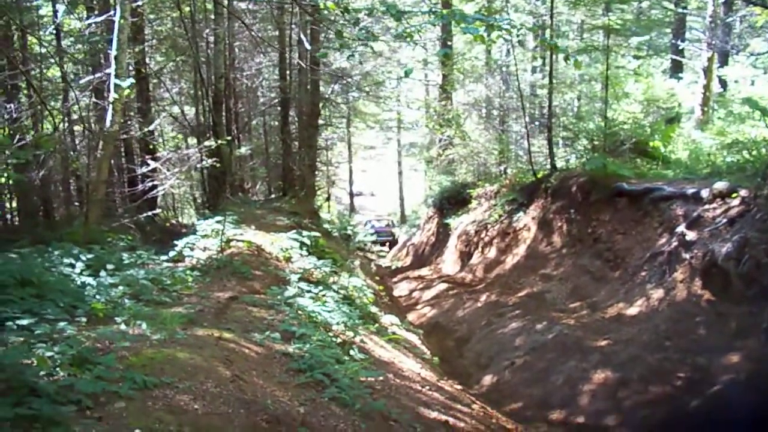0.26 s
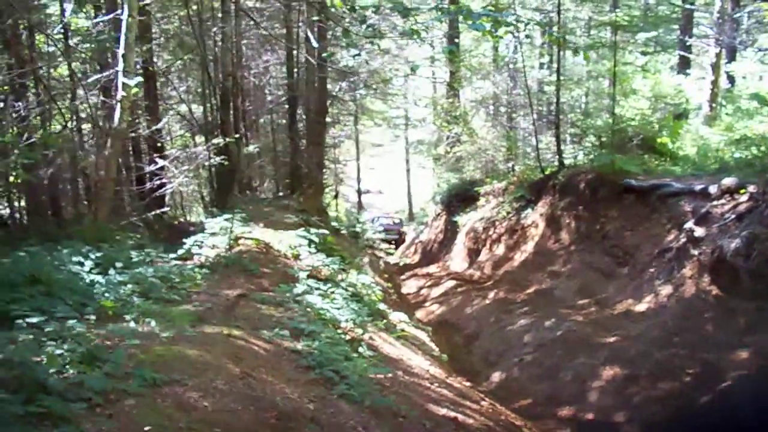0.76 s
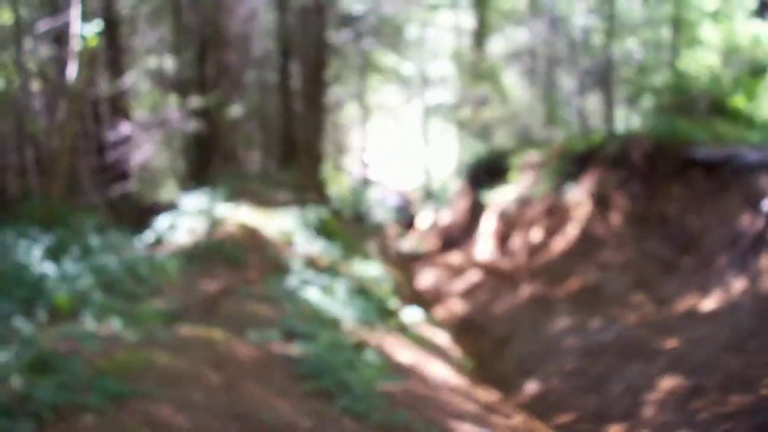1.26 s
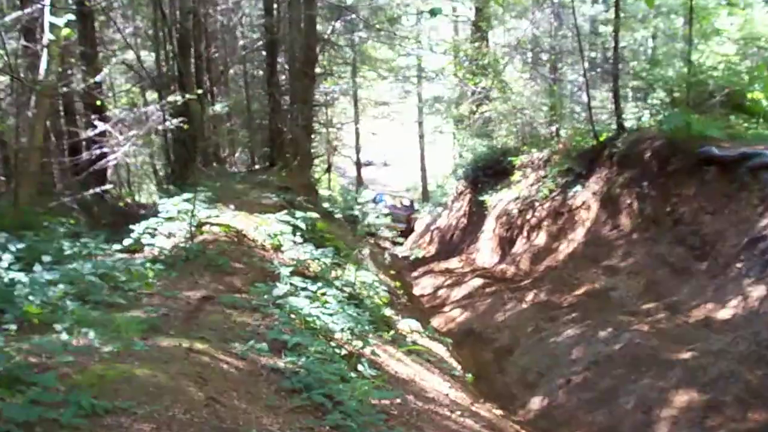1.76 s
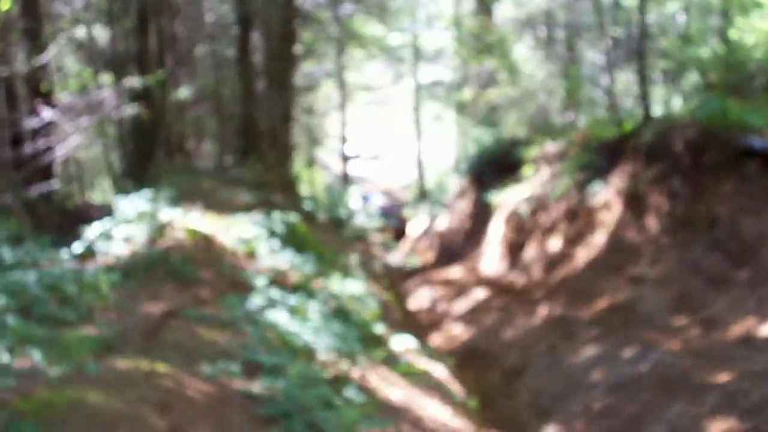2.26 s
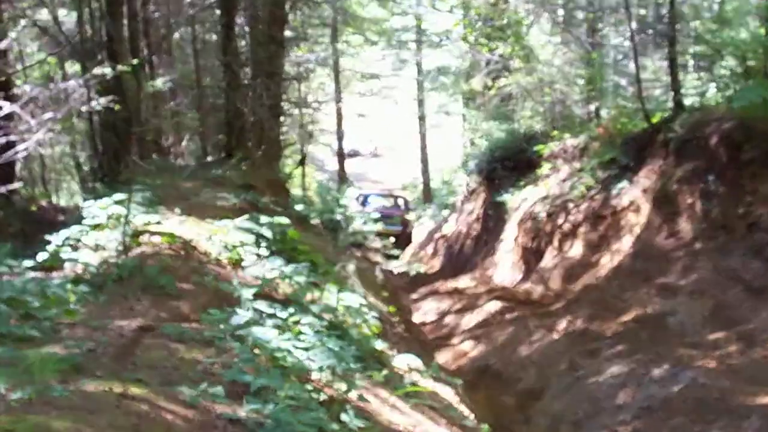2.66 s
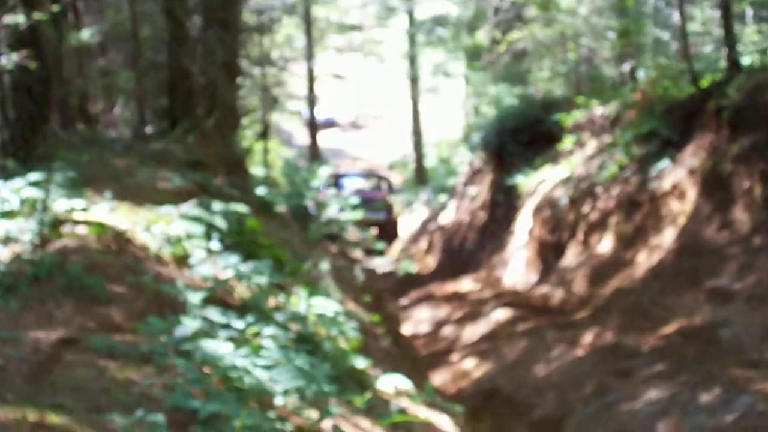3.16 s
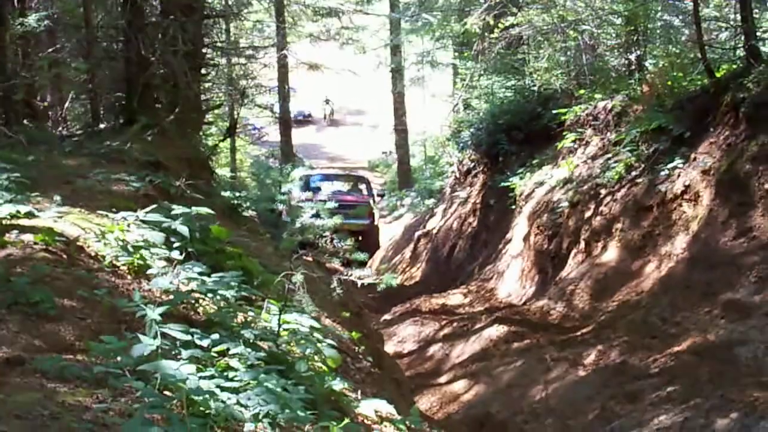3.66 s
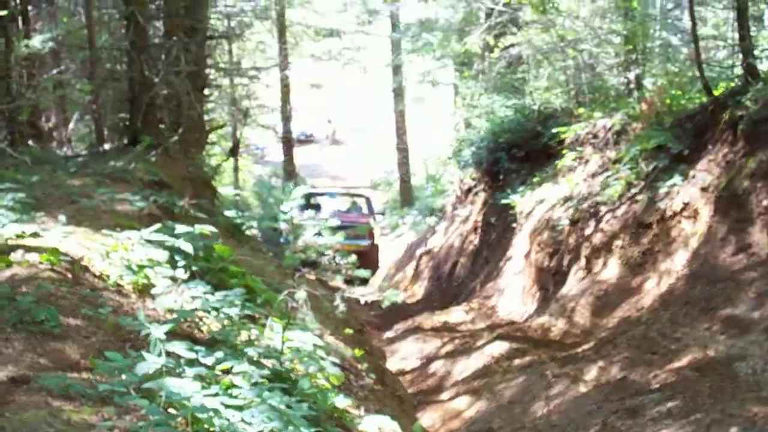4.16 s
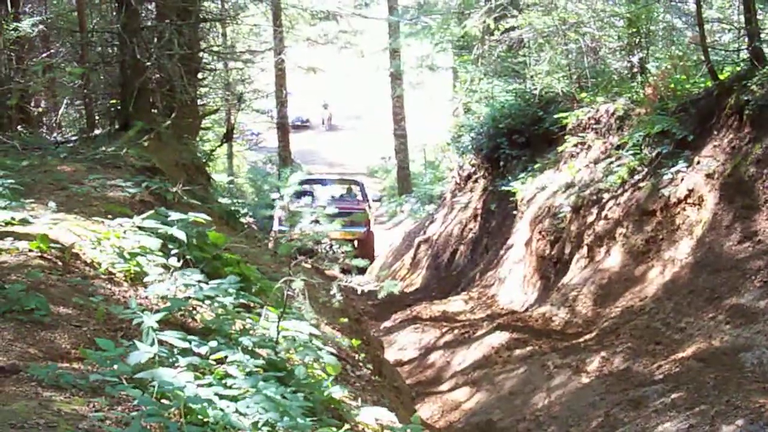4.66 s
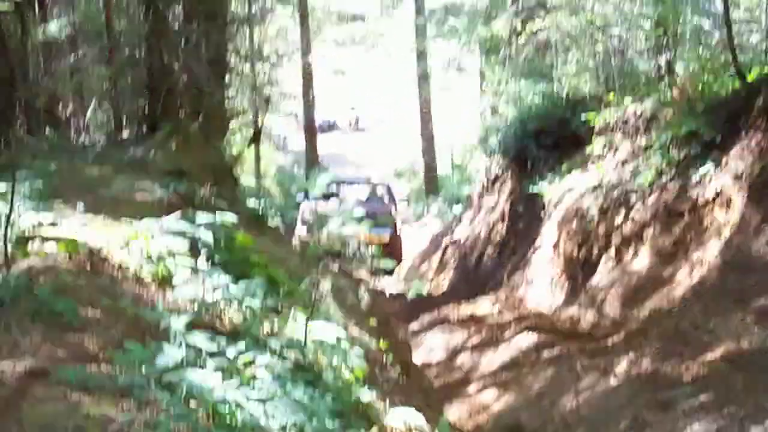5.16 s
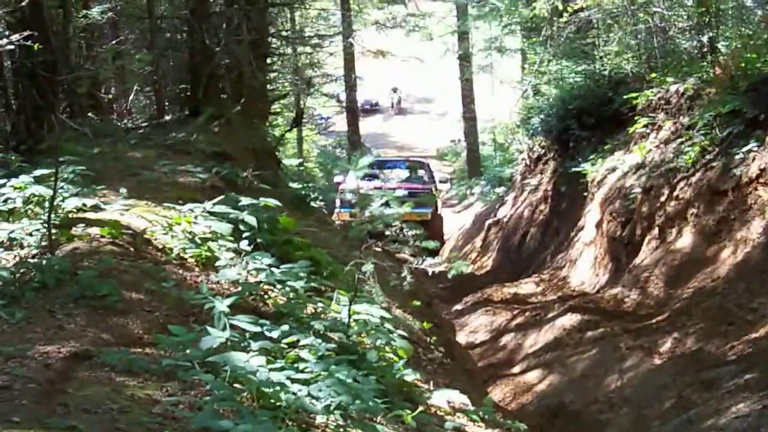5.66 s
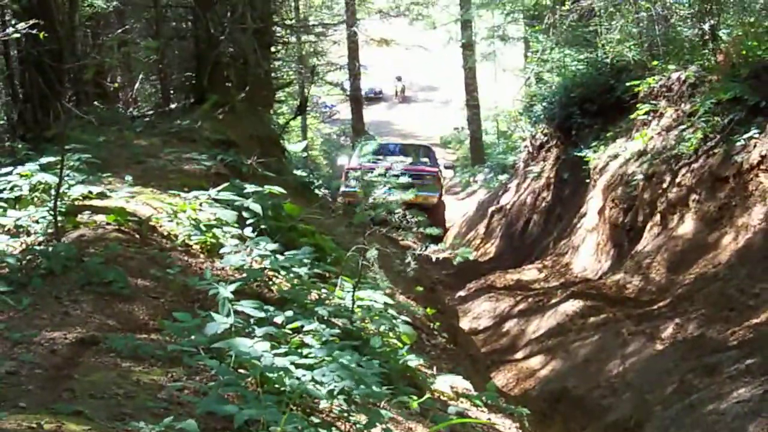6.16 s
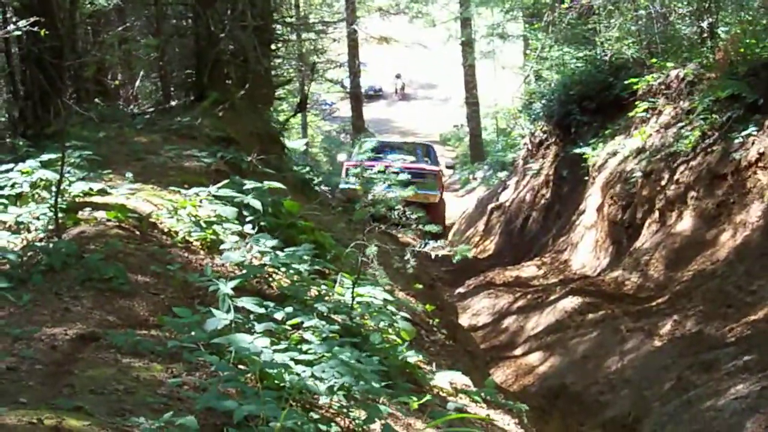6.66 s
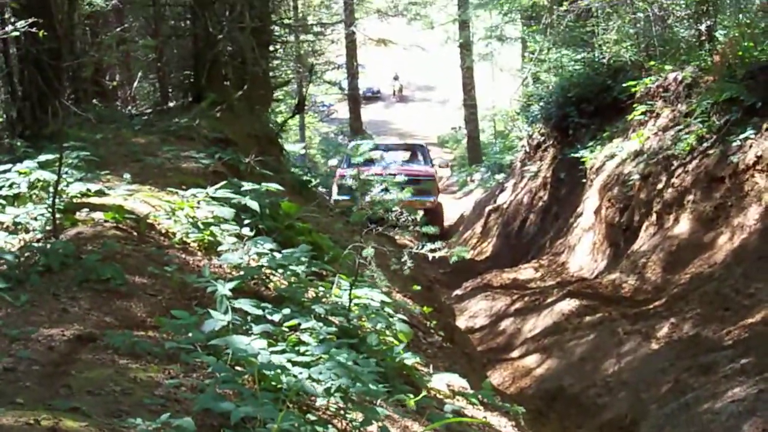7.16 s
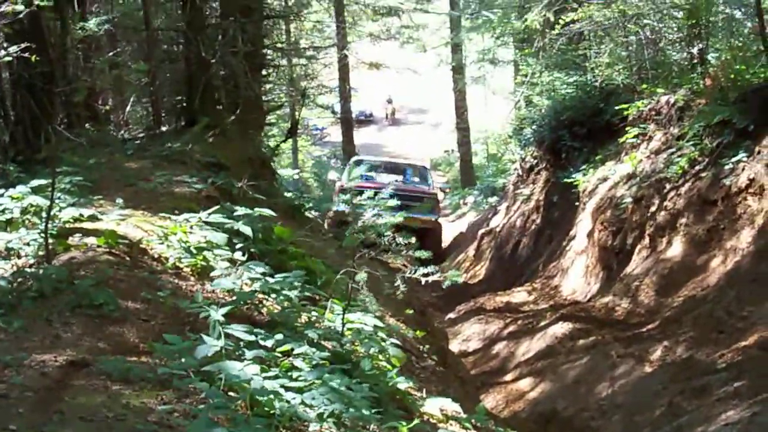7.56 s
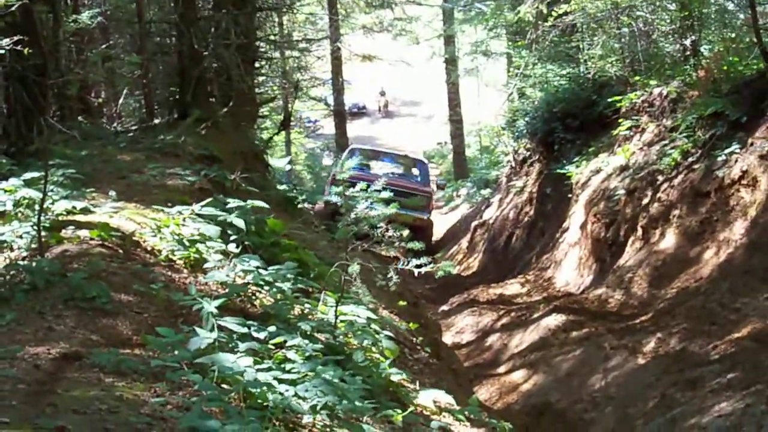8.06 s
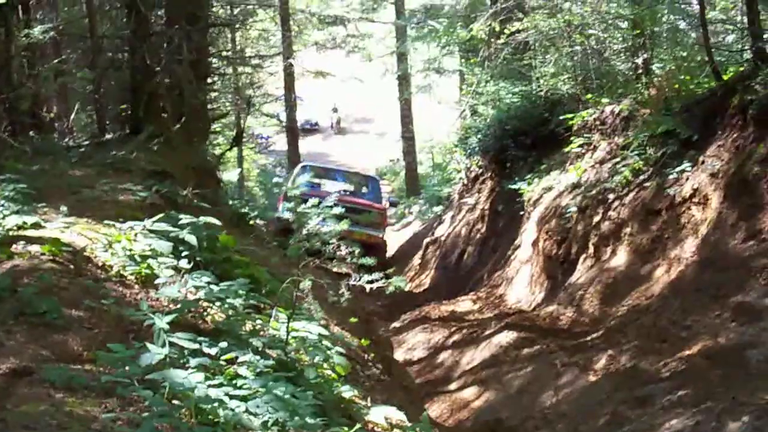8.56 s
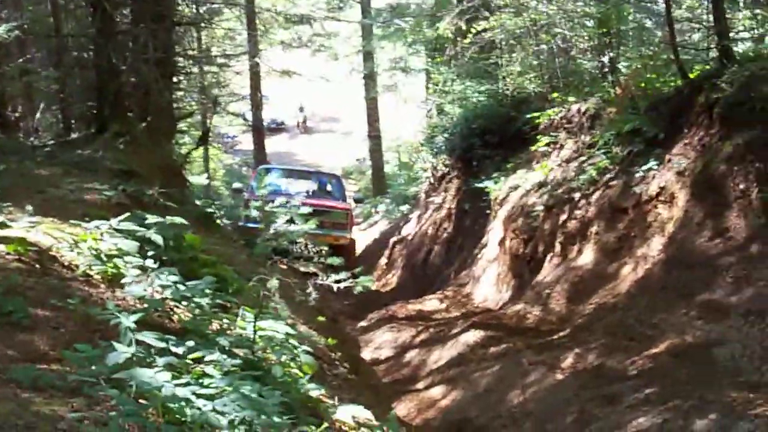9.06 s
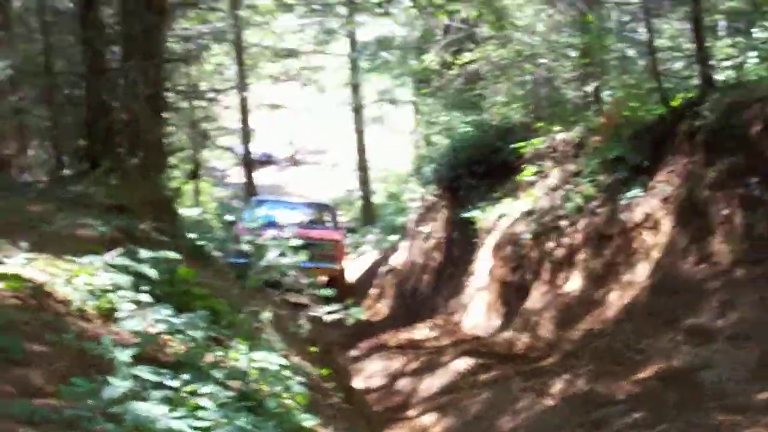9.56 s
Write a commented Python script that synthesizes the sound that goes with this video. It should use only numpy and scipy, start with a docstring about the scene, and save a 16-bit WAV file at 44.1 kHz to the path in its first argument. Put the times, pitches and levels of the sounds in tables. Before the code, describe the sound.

A diesel V8 works slowly uphill through a forest, burbling unevenly with rough exhaust bark and fine clatter. It sags early as the driver lifts off, then pulls harder, holds a higher throb and finally eases down, louder and nearer. Close to the hand-held camera, air thumps, plastic ticks and short zoom whirrs occupy the first few seconds over steady hiss.

```python
"""A V8 diesel truck crawls up a dirt gully in a forest, towards a hand-held camera.
Tones at multiples of the engine cycle make its boom and burble; bursts of noise at each firing make its
bark and clatter. All follow engine speed, pedal and distance: the driver lifts off, pulls harder, then eases.
Close by, air nudges the microphone, the camera body ticks and its zoom motor whirrs, all from noise but the air.
Leaves rustle once (a swell of noise) over the steady hiss of the forest and microphone."""
import sys
import numpy as np
from scipy import signal
from scipy.fft import rfft, irfft
from scipy.io import wavfile

SR = 44100
rng = np.random.default_rng(int(sys.argv[2]) if len(sys.argv) > 2 else 0)


def log_audio(samples):
    """Write samples as a 16-bit WAV file to the path given in sys.argv[1]."""
    # one column per channel
    frames = np.atleast_2d(samples).T
    # limit to full scale, then quantise
    limited = np.clip(frames, -1, 1)
    pcm = np.round(limited * 32767).astype(np.int16)
    wavfile.write(sys.argv[1], SR, pcm)


N = 432180
TIME = np.arange(N) / SR
BINS = np.fft.rfftfreq(N, 1 / SR)


def amp(db):
    """Decibels to gain."""
    return 10 ** (np.asarray(db) / 20)


def unit(x):
    """Scales to rms 1."""
    return x / np.sqrt(np.mean(x ** 2) + 1e-20)


def shape(points):
    """A spectrum in dB on every frequency bin, joined by lines over log frequency."""
    hz, db = np.transpose(points)
    return np.interp(np.log(BINS + 1), np.log(hz + 1), db)


def hump(hz, width_hz):
    """A resonance with steep skirts, in dB on every frequency bin."""
    return -20 * np.log10(1 + ((BINS - hz) / width_hz) ** 2)


def colour(x, db):
    """Filters x by a spectrum in dB; rms 1."""
    return unit(irfft(rfft(x) * amp(db), N))


def bell(s, half_length):
    """A smooth swell of height 1 around a moment."""
    return np.exp(-((TIME - s) / half_length) ** 2)


def wander(rate_hz):
    """Smooth chance of rms 1, drawn 400 times a second and joined by lines."""
    slow = np.arange(0, TIME[-1] + 1, 1 / 400)
    hz = np.fft.rfftfreq(len(slow), slow[1])
    spectrum = rfft(rng.standard_normal(len(slow)))
    drift = irfft(spectrum * np.exp(-(hz / rate_hz) ** 2), len(slow))
    return np.interp(TIME, slow, unit(drift))


# engine speed up the hill: (time [s], engine cycles a second [Hz])
ENGINE_SPEED = [(0, 13.55), (.75, 14.27), (1, 12.7), (1.25, 13.87), (1.88, 9.13), (2.25, 8.42),
                (2.88, 13.68), (3.55, 17.7), (4, 16.14), (5.2, 16.33), (5.62, 17.44), (6, 17.56),
                (6.5, 18.6), (6.88, 18.44), (7.12, 19), (7.75, 18.7), (8, 18.18), (8.25, 18.2),
                (8.62, 16.82), (8.88, 15.33), (9.8, 13.07)]


def engine_speed():
    """Engine cycles a second, joined by straight lines in time."""
    rows = np.asarray(ENGINE_SPEED)
    return np.interp(TIME, rows[:, 0], rows[:, 1])


# the driver eases off the pedal: (start [s], end [s], share of the pedal let go [0-1])
PEDAL_LIFTS = [(0.725, 1.21, 0.14), (1.35, 2.432, 0.7), (8.146, 10.01, 0.27)]
RELEASE_S, PRESS_S = 0.74, 0.27  # the foot comes off slowly and goes down quickly


def pedal_lift():
    """How far the foot is off the pedal, 0-1."""
    lift = 0
    for start, end, share in PEDAL_LIFTS:
        ramp = np.minimum((TIME - start) / RELEASE_S, (end - TIME) / PRESS_S)
        lift = lift + share * np.clip(ramp, 0, 1)
    return lift


# short stabs on the pedal: (time [s], half length [s], strength [0-1])
PEDAL_STABS = [(.62, .15, 0.8), (2.46, 0.1, 0.42), (2.804, 0.41, 0.94), (3.485, 0.38, 0.33)]


def effort(speed, level_db, octave_db, lift_db, stab_db):
    """Gain of an engine layer: level at 16 Hz, change per octave of revs, with pedal let go and at a stab."""
    octaves = np.log2(speed / 16)
    stab = sum(strength * bell(s, length) for s, length, strength in PEDAL_STABS)
    return amp(level_db + octave_db * octaves + lift_db * pedal_lift() + stab_db * stab)


START_M, CRAWL_M_PER_S = 49.7, 2.59  # distance of the truck at first, and its pace up the hill


def nearness():
    """The sound grows in inverse proportion to the distance."""
    return START_M / np.maximum(START_M - CRAWL_M_PER_S * TIME, 1)


# the eight firings in order; each bank fires unevenly: (strength at the near tailpipe [0-1])
FIRING_STRENGTHS = np.array([.96, .49, .47, .79, .47, .73, .96, .47])


def order_lag(order, dispersion=.18):
    """The firing pattern sets the phase of each order, and the silencer smears the pulses."""
    slots = np.arange(len(FIRING_STRENGTHS)) / len(FIRING_STRENGTHS)
    pattern = np.sum(FIRING_STRENGTHS * np.exp(-2j * np.pi * order * slots))
    return np.angle(pattern) + dispersion * order ** 2


def order_tone(turns, order):
    """One multiple of the engine cycle; rms 1."""
    return np.sqrt(2) * np.cos(2 * np.pi * order * turns + order_lag(order=order))


def firing_bursts(turns, speed, uneven, scatter_db, decay_s, wash):
    """Noise that flares at each firing and dies away, over a wash scattered by the trees."""
    cylinders = len(FIRING_STRENGTHS)
    firing = np.floor(turns * cylinders).astype(int)
    starts = np.flatnonzero(np.diff(firing)) + 1
    strength = np.abs(FIRING_STRENGTHS[firing[starts] % cylinders]) ** uneven
    scatter = rng.standard_normal(N // 100)[:len(starts)]
    kicks = np.zeros(N)
    kicks[starts] = strength * amp(scatter_db * scatter)
    # dividing by speed offsets the closer spacing of the firings at high revs
    power = signal.lfilter([1], [1, -np.exp(-2 / (decay_s * SR))], kicks ** 2 / speed)
    return np.sqrt(power / power.mean() + abs(wash)) * rng.standard_normal(N)


# the fifth order slides through the resonances of the pipe: (frequency [Hz], level before nearing [dB])
BOOM_RESONANCES = [(45, -40), (56, -45), (65, -31.5), (71, -30.5), (76, -33.5), (82, -28), (87, -25.5),
                   (95, -28.5)]
# the boom fades briefly: (time [s], half length [s], change [dB])
BOOM_FADES = [(4.574, 0.42, -6), (6.256, 0.21, -7)]


def boom(turns, speed, flutter=0.0094, lift_db=-14):
    """The uneven banks give a strong fifth order and a faint third."""
    pipe_db = np.interp(5 * speed, *np.transpose(BOOM_RESONANCES))
    fade_db = sum(db * bell(s, length) for s, length, db in BOOM_FADES)
    fifth = amp(pipe_db + fade_db + lift_db * pedal_lift()) * order_tone(turns, order=5)
    third_gain = effort(speed, level_db=-50, octave_db=14.5, lift_db=2.5, stab_db=-8.5)
    third = third_gain * order_tone(turns, order=3)
    return (fifth + third) * (1 + flutter * wander(rate_hz=8.9))


# uneven firing favours some multiples of the engine cycle: (relative level of orders 6, 7, 8, ... [dB])
USUAL_ORDERS = [3.5, 12.5, 22, 17, 12, 14.5, 13.5, 9, 9.5, 2, 10.5, 2, 4, 1.5, -4.5, 4, -3, -8, -9.5, -13.5,
                -0.5, -13.5, -6, -15.5, -8.5, -10, -8.5, -4.5, -7.5, -10.5]
# near cruising speed the pulses meet differently in the pipe: (relative level of the same orders [dB])
CRUISING_ORDERS = [5, 14.5, 15, 14.5, 14, 16.5, 16, 3, 8.5, 6.5, -1, 9, 9, 3.5, 1, -7.5, 4, -13.5, -5.5,
                   -3.5, -0.5, 0, -5.5, -5, -13.5, -4, -13.5, -0.5, -4.5, -9.5]
CRUISE_HZ, CRUISE_WIDTH_HZ = 16.1, 0.85  # engine cycles a second
# resonances that those orders slide through: (frequency [Hz], relative level [dB])
TAILPIPE_RESONANCES = [(70, -26.5), (88, -23.5), (110, -27.5), (130, -29), (150, -18), (185, -14),
                       (205, -23), (225, -13), (265, -23.5), (295, -17.5), (330, -25), (375, -13),
                       (415, -15), (455, -8.5), (560, -16), (680, -22.5)]


def burble(turns, speed, flutter=0.2, drift=0.084, bright_db=7):
    """Clean orders of the engine cycle shift in balance as they slide through the pipe's resonances."""
    out = np.zeros(N)
    revs = np.log2(speed / CRUISE_HZ)
    cruising = np.exp(-((speed - CRUISE_HZ) / CRUISE_WIDTH_HZ) ** 2)
    for order, (usual_db, cruise_db) in enumerate(zip(USUAL_ORDERS, CRUISING_ORDERS), start=6):
        size = (1 - cruising) * amp(usual_db) + cruising * amp(cruise_db)  # blend of the two patterns
        fading = 1 + flutter * order / 10 * wander(rate_hz=2.87)  # paths between the trees change
        tailpipe_db = np.interp(order * speed, *np.transpose(TAILPIPE_RESONANCES))
        edge_db = bright_db * revs * np.log2(order / 10)  # the pulses sharpen with the revs
        slip = drift * wander(rate_hz=0.83) / order  # each phase drifts, so the throb changes shape
        tone = order_tone(turns + slip, order=order)
        out += size * amp(tailpipe_db + edge_db) * fading * tone
    return out * effort(speed, level_db=-34, octave_db=0.5, lift_db=-11, stab_db=2.0)


# rough puffs through pipe and silencer: (frequency [Hz], relative level per Hz [dB])
PIPE_SPECTRUM = [(25, -4.5), (55, -3.5), (90, 1.5), (170, 6), (250, 0), (340, -8), (450, 2), (560, -0.5),
                 (630, -3.5), (720, -29), (1100, -29), (2500, -59)]


def bark(turns, speed, sway_db=0.66):
    """Ragged puffs of gas in the pipe sink in level as the revs rise and the firing gets cleaner."""
    puffs = firing_bursts(turns, speed, uneven=1.7, scatter_db=1, decay_s=.006, wash=.5)
    level = effort(speed, level_db=-37.5, octave_db=-8, lift_db=-25.5, stab_db=2)
    sway = amp(sway_db * wander(rate_hz=4.8))
    return colour(puffs, shape(PIPE_SPECTRUM)) * level * sway


# radiation of the engine block: (frequency [Hz], relative level per Hz [dB])
BLOCK_SPECTRUM = [(300, -4.5), (700, -4.5), (1100, -4.5), (1800, -4.5), (2250, -3), (2600, -4.5),
                  (3100, -12.5), (4000, -14), (5500, -16), (7200, -19.5), (8000, -27.5), (8800, -44.5)]
# ringing engine covers: (frequency [Hz], width [Hz], level above the block [dB])
COVER_RINGS = [(815, 70, 6), (1286, 12, 9), (1511, 222, 8)]


def clatter(turns, speed, rasp_hz=2350, rasp_width_hz=420, clump_db=1.4):
    """Diesel knock rings block and covers at every firing; a thin rasp clumps and flares at each stab."""
    knocks = firing_bursts(turns, speed, uneven=.9, scatter_db=1.3, decay_s=.005, wash=1.8)
    ring_db = sum(db / (1 + (2 * (BINS - hz) / width) ** 2) for hz, width, db in COVER_RINGS)
    block_gain = effort(speed, level_db=-44.0, octave_db=7, lift_db=-5, stab_db=2.5)
    block = colour(knocks, shape(BLOCK_SPECTRUM) + ring_db) * block_gain
    taps = firing_bursts(turns, speed, uneven=1.3, scatter_db=1.3, decay_s=.006, wash=1.2)
    clumps = amp(clump_db * wander(rate_hz=20))
    rasp_gain = effort(speed, level_db=-53.5, octave_db=8, lift_db=-5.5, stab_db=4.5)
    rasp = colour(taps, hump(rasp_hz, rasp_width_hz)) * clumps * rasp_gain
    return block + rasp


def truck(shake=.002):
    """One crankshaft, turning slightly unsteadily, drives every engine layer."""
    speed = engine_speed()
    turns = np.cumsum(speed * (1 + shake * wander(rate_hz=10))) / SR
    layers = boom(turns, speed) + burble(turns, speed) + bark(turns, speed) + clatter(turns, speed)
    return layers * nearness()


# still forest and microphone hiss: (frequency [Hz], relative level per Hz [dB])
FOREST_SPECTRUM = [(30, 5), (100, -11.5), (450, 2.5), (750, -12), (2000, -24.5), (3200, -18.5), (7200, -26),
                   (8700, -52.5)]


def forest(level_db=-50):
    """Steady coloured noise for the still forest and the microphone's hiss."""
    return amp(level_db) * colour(rng.standard_normal(N), shape(FOREST_SPECTRUM))


# slow pushes of air on the microphone: (turning point [s], peak level [dB], time from peak to turn [s])
AIR_PUFFS = [(0.585, -15.5, 0.072), (0.885, -30.5, 0.058), (2.187, -23.5, 0.056)]
REBOUND = 0.76  # share of the push that swings back


def air():
    """Each puff pushes the diaphragm in and lets it swing back, less far."""
    out = np.zeros(N)
    for s, db, length in AIR_PUFFS:
        from_turn = (TIME - s) / length
        swing = -amp(db) * from_turn * np.exp((1 - from_turn ** 2) / 2)
        out += np.where(swing > 0, swing, REBOUND * swing)
    return out


# ticks and creaks of the camera body:
# (time [s], starting level before the housing [dB], decay time [s], centre [Hz])
BODY_TICKS = [(0.510, -28, .0025, 1500), (0.533, -20.5, .0014, 1100), (0.608, -29, .002, 5500),
              (0.681, -35, .012, 3600), (0.706, -26, .004, 600), (1.508, -27.5, .004, 3800),
              (1.709, -40, .006, 3000), (1.859, -33, .004, 220), (2.135, -44, .004, 700),
              (2.298, -27, .004, 4600), (2.512, -36, .006, 4000), (3.577, -29.5, .0015, 6500),
              (4.075, -28, .0012, 5000), (4.506, -25, .002, 3200)]


def ticks():
    """Short dry snaps and knocks of plastic, each in its own broad band, dulled by the housing."""
    out, t = np.zeros(N), TIME[:SR // 10]
    for s, db, decay_s, hz in BODY_TICKS:
        band = signal.butter(1, [hz / 2, min(hz * 2, SR / 3)], "band", fs=SR)
        noise = unit(signal.lfilter(*band, rng.standard_normal(len(t))))
        out[round(s * SR):][:len(t)] += amp(db) * noise * np.exp(-t / decay_s)
    housing = signal.butter(8, 7700, fs=SR, output="sos")
    return signal.sosfilt(housing, out)


# zoom motor runs: (start [s], end [s], level before the waver [dB])
ZOOM_RUNS = [(0.682, 1.328, -50), (1.693, 2.103, -52), (2.5, 3.2, -49.5)]
# whirr of the zoom gears: (frequency [Hz], relative level per Hz [dB])
GEAR_SPECTRUM = [(400, -3), (850, 5), (1500, 2), (2700, 0), (3600, -4), (4300, -1), (5600, -4), (6100, 0),
                 (6500, 0), (6900, -8), (7350, -2), (8000, -15), (8800, -34)]


def zoom_motor(ramp_s=0.017, waver_db=2.4):
    """The lens drive whirrs in three short runs of wavering, coloured noise."""
    running = np.zeros(N)
    for start, end, db in ZOOM_RUNS:
        ramp = np.minimum(TIME - start, end - TIME) / ramp_s
        running += amp(db) * np.clip(ramp, 0, 1)
    whirr = colour(rng.standard_normal(N), shape(GEAR_SPECTRUM))
    return running * amp(waver_db * wander(rate_hz=12)) * whirr


# dry leaves rustle once: (time [s], half length [s], peak level [dB], centre [Hz], width [Hz])
LEAF_RUSTLE = (8.88, .04, -51, 4600, 700)


def leaves():
    """A brief soft swish of noise around one resonance."""
    s, length, db, hz, width = LEAF_RUSTLE
    return amp(db) * bell(s, length) * colour(rng.standard_normal(N), hump(hz, width))


def scene():
    """The approaching truck, the forest and the small noises close to the microphone, in mono."""
    return (truck() + forest() + air() + ticks() + zoom_motor() + leaves())[None]


def record(dry, edge_hz=8850):
    """The camera's narrow audio band cuts everything above its edge."""
    taps = signal.firwin(401, edge_hz, window=("kaiser", 9), fs=SR)
    return signal.oaconvolve(dry, taps[None], "same")


dry = scene()
out = record(dry)
log_audio(out)
```